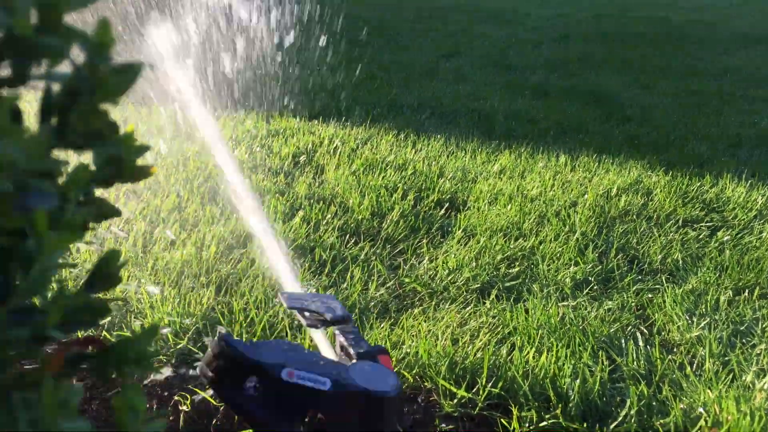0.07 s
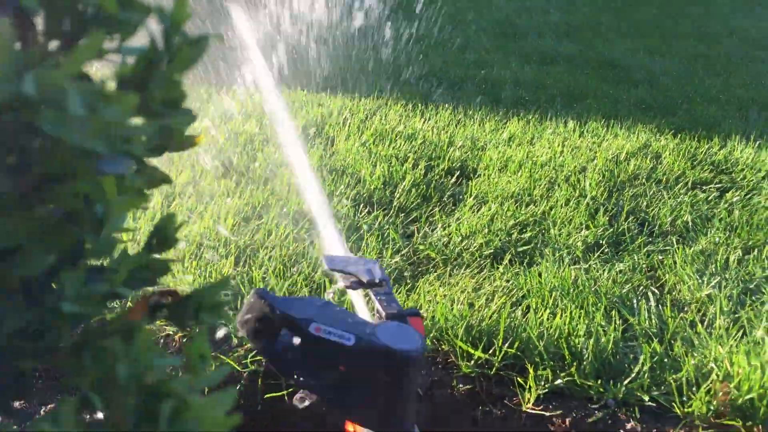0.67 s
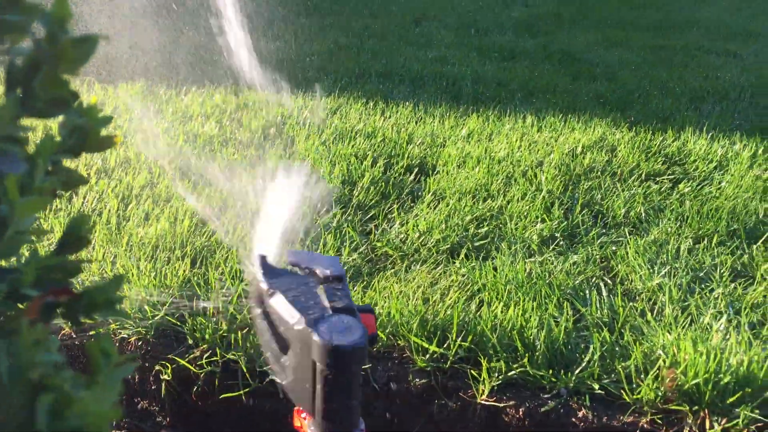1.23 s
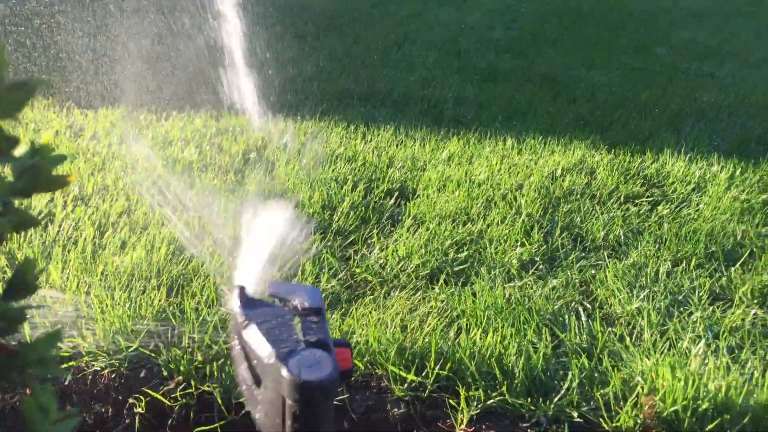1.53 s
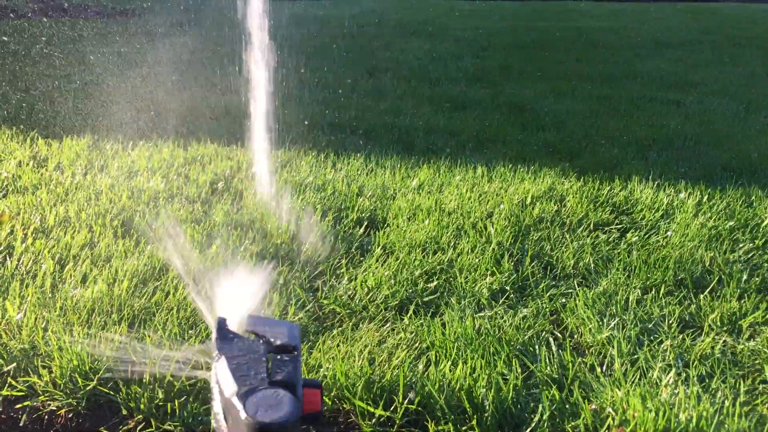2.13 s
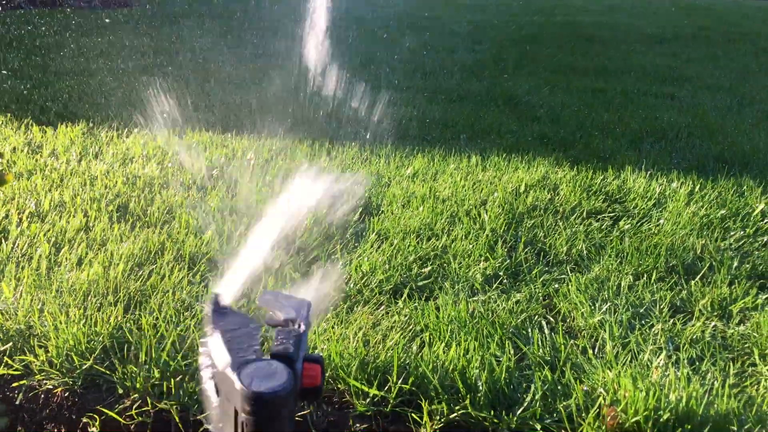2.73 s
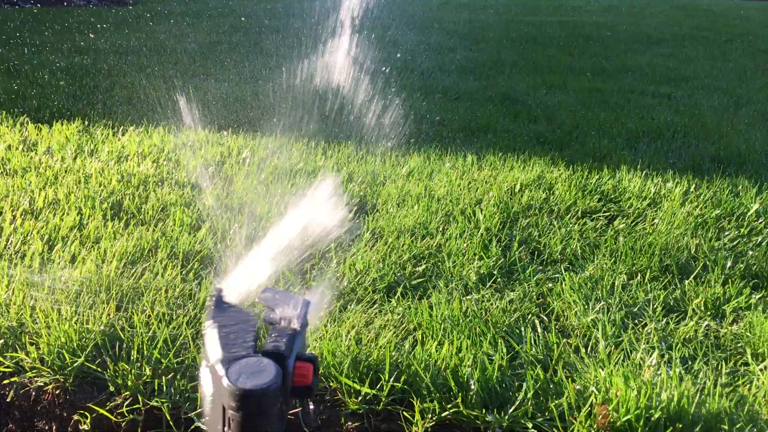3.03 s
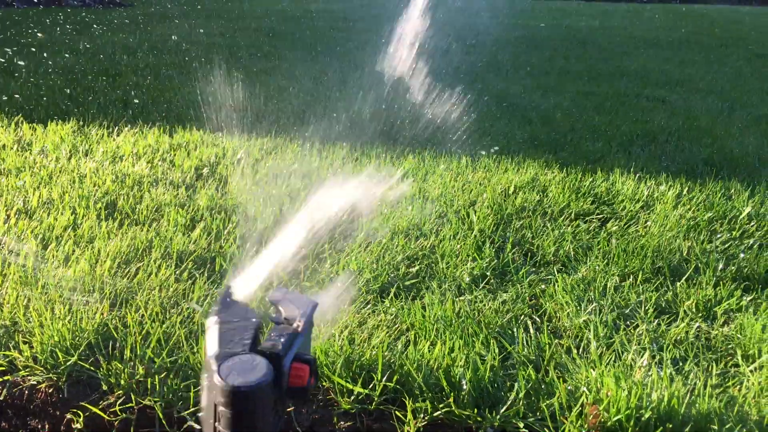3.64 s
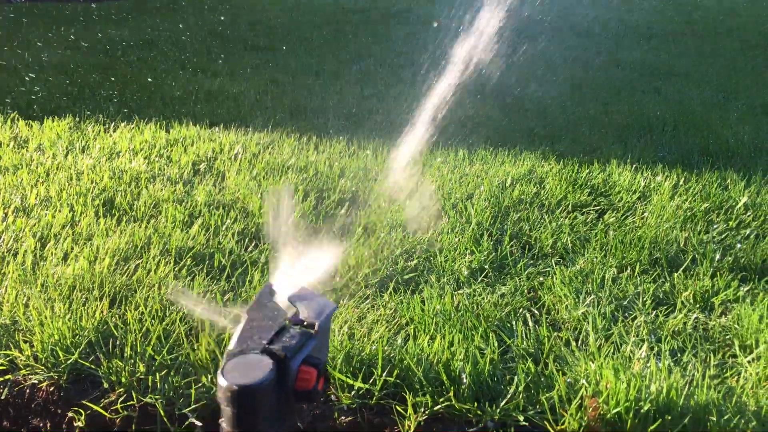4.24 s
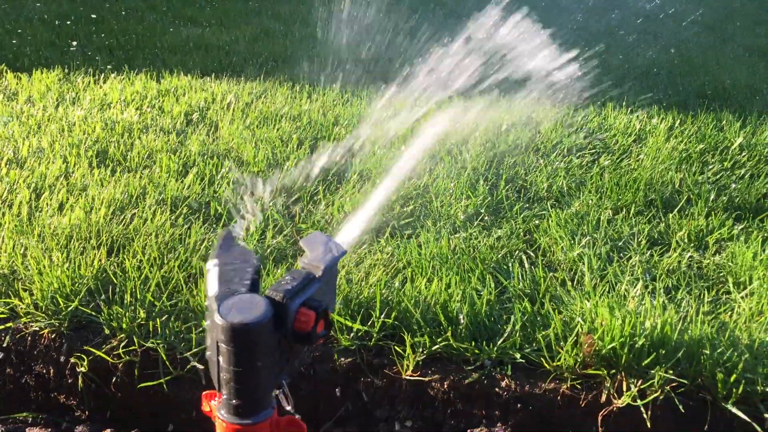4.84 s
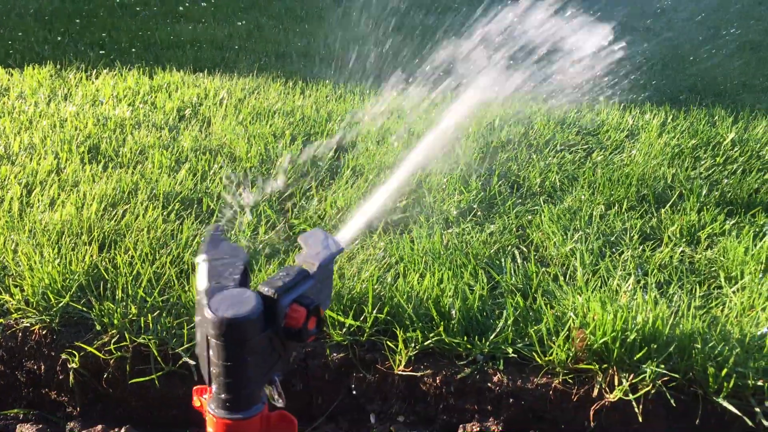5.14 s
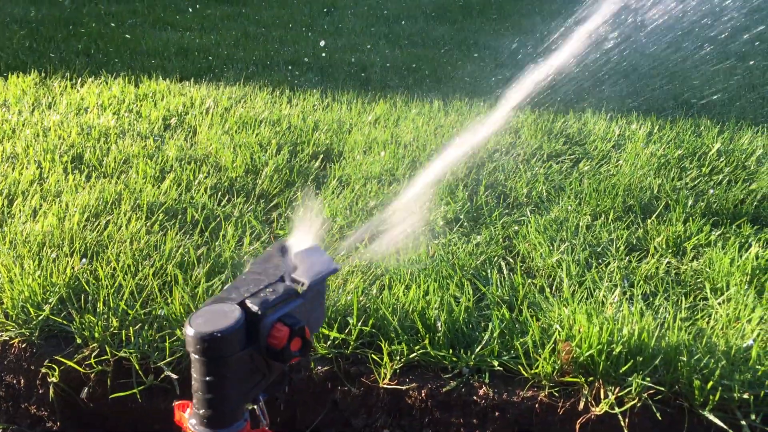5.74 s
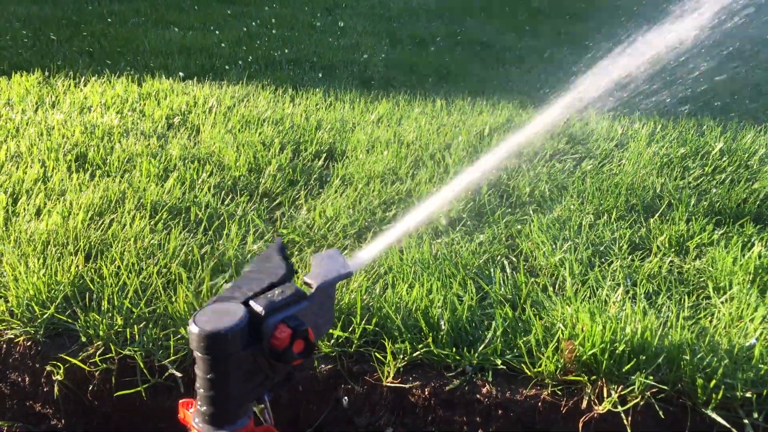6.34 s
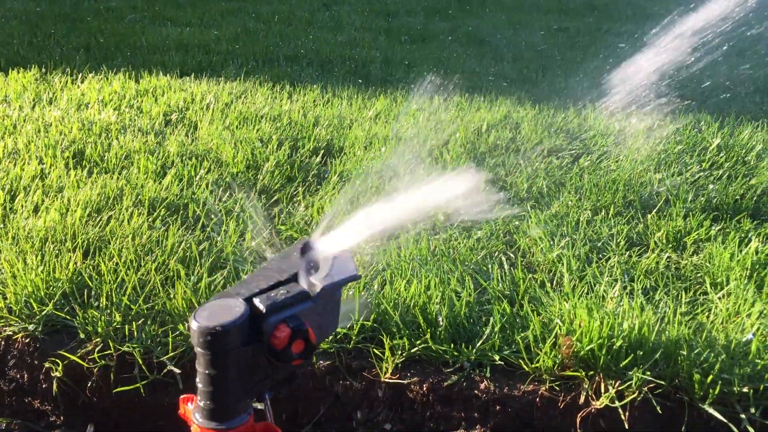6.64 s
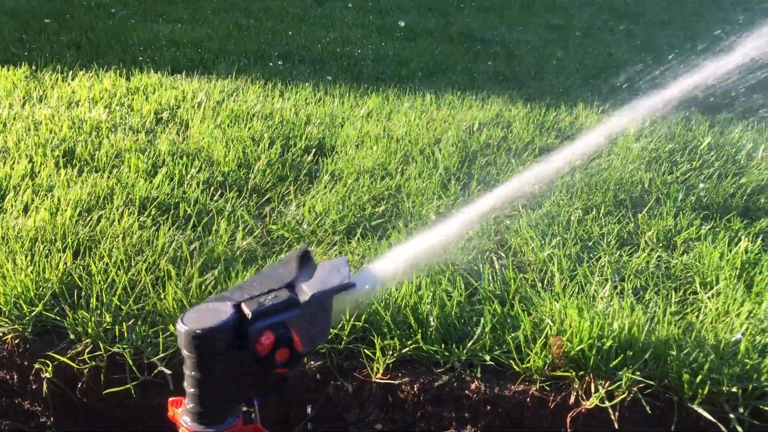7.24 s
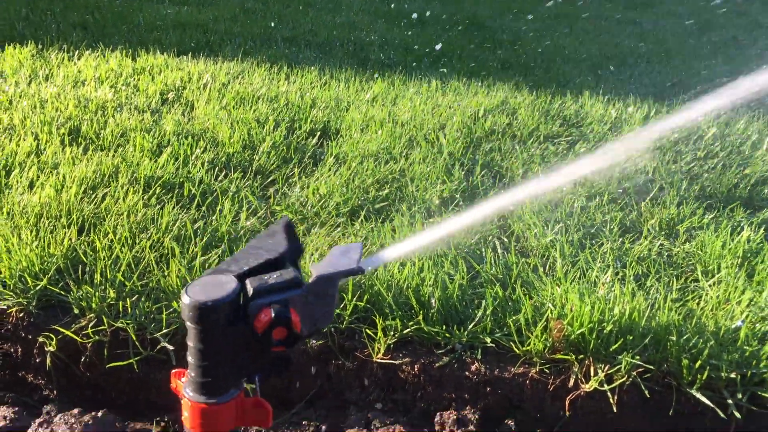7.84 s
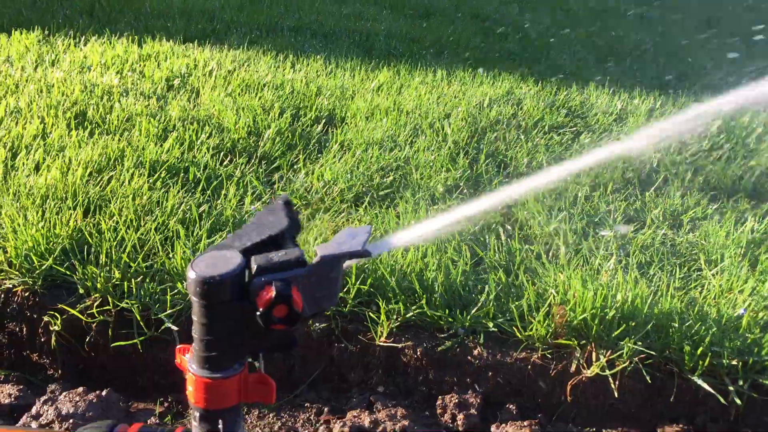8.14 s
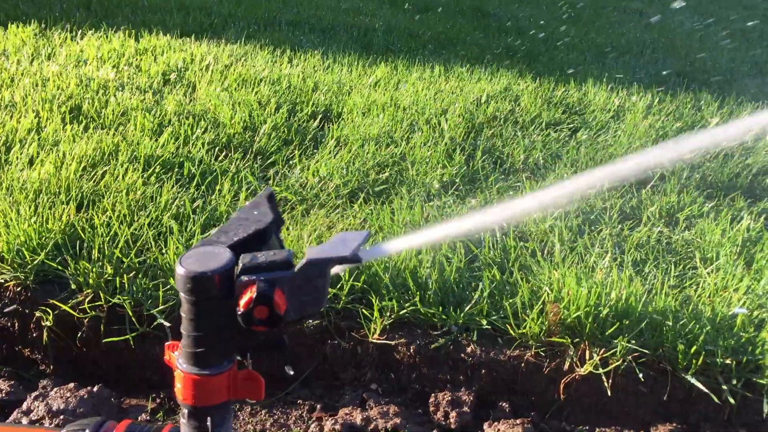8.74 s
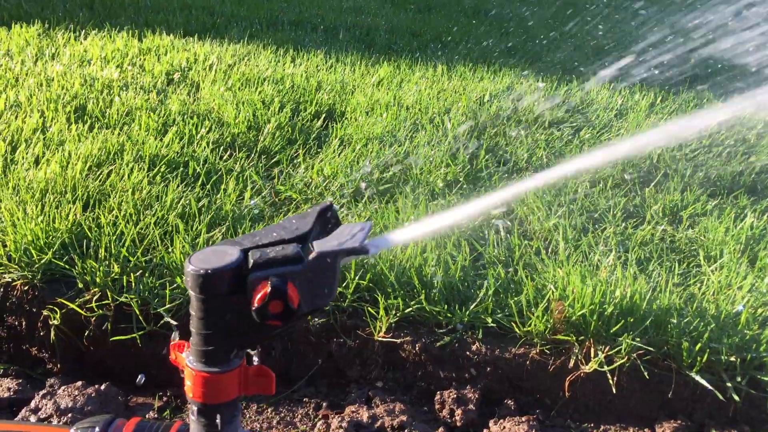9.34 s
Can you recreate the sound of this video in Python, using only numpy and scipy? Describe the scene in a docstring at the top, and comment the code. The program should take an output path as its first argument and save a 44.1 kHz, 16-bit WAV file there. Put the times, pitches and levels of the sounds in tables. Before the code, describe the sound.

A garden sprinkler ticks rapidly and regularly near the microphone, each stroke a hard plastic clack with a short wet slap. Underneath, the water jet hisses without a break and flung drops patter softly on the grass. A quiet neighbourhood rumble and a far-off engine hum, strongest at first, sit behind. At the very end the arm briefly flutters faster as it reverses.

```python
"""A steady hiss and sharp, even ticks: an impact sprinkler steps round on a lawn, close by.
Turbulence in the jet makes the hiss. Each swing of the sprung plastic arm slaps through the water,
knocks the frame into resonance and flings spray that patters on the grass. At the end the head trips
into reverse and the arm flutters fast. Distant engines hum over a low rumble, loudest at first."""
import sys
import numpy as np
from scipy import signal
from scipy.fft import rfft, irfft
from scipy.io import wavfile
from scipy.ndimage import uniform_filter1d

SR = 44100
rng = np.random.default_rng(int(sys.argv[2]) if len(sys.argv) > 2 else 0)


def dump(signal):
    """Clip the signal to [-1, 1] and save it as 16-bit WAV at the path in sys.argv[1]."""
    limited = np.clip(np.atleast_2d(signal).T, -1, 1)
    pcm = np.round(limited * 32767).astype(np.int16)
    wavfile.write(sys.argv[1], SR, pcm)


N = 418509
TIME = np.arange(N) / SR
TRIP_S = 9.264  # the reversing stop first catches the arm

# forward swings of the arm: (time [s], relative blow level [dB])
ARM_SWINGS = [(0.1386, -17.5), (0.29, -19.5), (0.4405, -18.5), (0.5902, -16.5), (0.7397, -17),
              (0.8882, -18), (1.0416, -16.5), (1.1891, -20.0), (1.339, -19.5), (1.4904, -20),
              (1.641, -18.5), (1.79, -18.5), (1.9447, -17), (2.0973, -18.5), (2.2475, -19.0),
              (2.398, -18.5), (2.5391, -18), (2.6842, -18.5), (2.8358, -19), (2.9864, -18.5),
              (3.137, -19.5), (3.2933, -16.5), (3.443, -18.5), (3.5933, -17), (3.7365, -19.0),
              (3.894, -16.5), (4.0452, -19), (4.202, -17), (4.3489, -19.5), (4.5046, -15.5), (4.651, -16),
              (4.8007, -16), (4.953, -15.5), (5.1039, -17.5), (5.251, -17.0), (5.406, -14.5), (5.5526, -19),
              (5.7101, -15.0), (5.854, -17.5), (6.0098, -16.5), (6.161, -18), (6.3139, -17.0),
              (6.4636, -20.5), (6.6193, -16.5), (6.774, -19), (6.931, -17.0), (7.0857, -18.0),
              (7.2437, -16.0), (7.3922, -19.5), (7.5476, -18.5), (7.6988, -18.5), (7.8566, -18),
              (8.0098, -18.5), (8.1657, -17.5), (8.3175, -18), (8.4689, -17.5), (8.625, -17),
              (8.781, -17.5), (8.9348, -16.5), (9.0861, -17), (9.2415, -15)]
# where the nozzle points: (time [s], heading right of straight ahead [deg])
NOZZLE_HEADING = [(0, -28.5), (9.25, 69), (9.49, 59.5)]
# modes of the plastic head: (frequency [Hz], width [Hz], level [dB], loudest heading [deg], beam [deg])
HEAD_MODES = [(313,96,-16.5,-27,19), (508,110,-13.5,67,36.6), (1133,110,-7,-30,130), (1574,82,-7.5,59,49),
              (1947,123,-1,29,44), (2200,216,1,26,81), (2460,330,-2,-25,110), (3170,220,-3,71,22),
              (3660,250,-4,12,47), (4130,200,-8.5,65,76), (4630,114,-4,13,55), (5467,260,0,31,36),
              (6170,84,1,14,20), (6530,240,-2.5,64,60), (7370,176,-3,28,26), (7980,280,-6.5,-28,47),
              (8350,780,-5.5,101,70), (9500,330,-2,91,24), (11420,530,-12,87,170), (13200,860,-11,85,89),
              (15200,570,-21,50,75)]


def arm(usual_blow_db=-17.6, stop_delay_s=0.0255):
    """A spring-driven oscillator: slow swings step the head on; quick ones, cut short, drive it back."""
    # swings in reverse: (time [s], relative slap level [dB], relative stop level [dB])
    flutter = [(9.312, -21, -29.5), (9.376, -21.5, -30), (9.438, -22, -26)]
    out = np.zeros(N)
    for s, blow_db in ARM_SWINGS:
        # harder blows are brighter, as is the frame when turned to the microphone
        tilt_db = 0.73 * (blow_db - usual_blow_db) + 0.6 * facing(s, aim_deg=24, beam_deg=25)
        water_db = -22.5 - 3 * facing(s, aim_deg=18, beam_deg=32.4)  # the head shades the slap
        add(out, *knock(s, blow_db - 4.5 - tilt_db / 2, blow_db - 1.53 + tilt_db / 2))
        add(out, *slap(s, water_db - 0.6, hold_s=0.015, roughness=0.8))
        add(out, *recoil(s, water_db - 24))
    for s, water_db, stop_db in flutter:
        add(out, *slap(s, water_db - 4, hold_s=0.019, roughness=1.5))
        add(out, *reversing_stop(s + stop_delay_s, stop_db))
    add(out, *reversing_stop(TRIP_S, -24))
    return out


def knock(s, hollow_db, rattle_db, lead_s=0.0016, contact_s=0.00079, split_hz=3200):
    """Impact excitation: the arm touches, seats and rebounds, ringing the modes of the head."""
    t = np.arange(512) / SR
    seat_s = 0.001221 * rng.uniform(0.7, 1.3)
    rebound_s = seat_s + 0.00221 * rng.uniform(0.63, 1.58)
    contacts = gain_of(1) * np.exp(-t / contact_s)
    pushes = np.zeros(len(t))
    for when, db in ((seat_s, 0), (rebound_s, -12)):
        contacts += gain_of(db) * (t >= when) * np.exp(-abs(t - when) / contact_s)
        add(pushes, when, gain_of([db]))
    rattle = filtered(contacts * rng.choice([-1, 1], len(t)), 4, split_hz, "high")
    head = impulse_response(HEAD_MODES, s)
    hollow = signal.fftconvolve(filtered(pushes, 4, split_hz, "low"), head)
    bright = signal.fftconvolve(rattle, head)
    blow = gain_of(hollow_db) * unit_rms(hollow) + gain_of(rattle_db) * unit_rms(bright)
    return s - lead_s, blow * np.sqrt(0.0046 * SR / len(blow))  # the energy of 4.6 ms at these levels


def slap(s, db, hold_s, roughness, rise_s=0.0048, release_s=0.0029, sag_db_per_s=208, lead_s=0.0005):
    """Jet break-up: water bursts on the arm in lumpy noise, sagging for the hold_s it stays in the jet."""
    # slap resonances: (frequency [Hz], width [Hz], level [dB], loudest heading [deg], beam [deg])
    slap_modes = [(1290, 92, -15, -16, 120), (2200, 515, -6, 89, 320), (3645, 650, -1.5, -38, 150),
                  (4120, 680, -1, 81, 94), (5490, 420, -1.9, 80, 680), (6550, 1030, -3.5, 85, 140),
                  (7600, 170, -10, -40, 250), (8670, 710, -3, 88, 200), (9870, 290, -7, 85, 179),
                  (11400, 1050, -9, -40, 250), (13242, 1200, -11, 85, 88), (16500, 3600, -11.5, 85, 250)]
    t = np.arange(-512, 1536) / SR
    envelope = bell(np.minimum(t, 0), 0, rise_s) * np.exp(-np.maximum(t - hold_s, 0) / release_s)
    splatter = unit_rms(rng.standard_normal(len(t)) * gain_of(roughness * drift(len(t), per_s=1519)))
    burst = splatter * envelope * gain_of(db - sag_db_per_s * (t - hold_s))
    return s + t[0] - lead_s, signal.fftconvolve(burst, impulse_response(slap_modes, s))


def recoil(s, db, release_s=0.0158, push_s=0.0019):
    """Reaction force: the stem thuds softly as the arm loads the jet and again as it lets go."""
    t = np.arange(-512, 2048) / SR
    load = bell(t, 0, push_s) + gain_of(-6) * bell(t, release_s, push_s)
    return s + t[0], gain_of(db) * load * noise_band(len(t), hz=[130, 380])


def reversing_stop(s, db, ring_hz=4200, width_s=0.0028):
    """Contact chatter: the wet arm rattles on the stop, exciting the head's modes and a brief tone."""
    t = np.arange(-256, 256) / SR
    chatter = signal.fftconvolve(rng.standard_normal(len(t)), impulse_response(HEAD_MODES, s))[:len(t)]
    tone = gain_of(-3) * np.sin(2 * np.pi * ring_hz * t)
    envelope = gain_of(db + 1.5) * np.exp(-(t / width_s) ** 2 / 2)
    return s + t[0], envelope * (unit_rms(chatter) + tone)


def jet(patchy_db=1.17, flicker_db=1.57, waver_db=1.46, mist_db=-5, split_hz=7400):
    """Turbulence drives the nozzle's resonances: rush below, fizz above, coloured by the heading."""
    # nozzle resonances: (frequency [Hz], width [Hz], level [dB], loudest heading [deg], beam [deg])
    nozzle_modes = [(640,49,-7.5,-5,56), (1720,360,-2.5,30,69), (2230,740,-4,34,120), (3300,540,0,-48,58),
                    (4010,390,-0.5,16,220), (5460,980,-5.5,68,240), (6550,740,-6,92,83),
                    (8360,510,-1.5,68,410), (9780,240,2,75,140), (11300,220,8,-40,52), (11450,580,2,55,200),
                    (12800,370,1,5,90), (13600,1200,-2,65,160), (15500,1400,-2,87,160)]
    hz, t, spectrum = signal.stft(rng.standard_normal(N), SR, nperseg=512, noverlap=384)
    patches = smoothed(uniform_filter1d(rng.standard_normal(spectrum.shape), size=6, axis=0), frames=10)
    flicker = smoothed(rng.standard_normal(len(t)), frames=3)
    spectrum *= gain_of(patchy_db * patches + flicker_db * flicker)
    # as the flow shifts, each resonance swells on its own and all drift a little in pitch
    wavers = smoothed(rng.standard_normal((len(nozzle_modes), len(t))), frames=16)
    detune = 1 + 0.0073 * smoothed(rng.standard_normal(len(t)), frames=50)
    colour = sum((radiated([mode], hz[:, None] * detune, t) * gain_of(waver_db * waver)) ** 2
                 for mode, waver in zip(nozzle_modes, wavers))
    treble = 1 / (1 + (split_hz / (hz[:, None] + 1)) ** 10)
    colour += gain_of(mist_db) ** 2 * treble  # mist torn off the jet hisses without a pitch
    rush_db, fizz_db = jet_levels(t)
    power = 0
    for share, db in ((1 - treble, rush_db), (treble, fizz_db)):
        running_mean = uniform_filter1d(np.mean(colour * share, axis=0), size=60)
        power += colour * share / running_mean * gain_of(db) ** 2
    return signal.istft(spectrum * np.sqrt(power), nperseg=512, noverlap=384)[1][:N]


def jet_levels(t, rush_db=-41.5, fizz_db=-39, step_db=0.56):
    """Directivity: the jet is louder side-on; its rush also grows on grazing a shrub and in reverse."""
    steps = np.searchsorted([s for s, _ in ARM_SWINGS], t)
    shift_db = step_db * rng.standard_normal(len(ARM_SWINGS) + 1)[steps]
    side_on_db = 1.5 * facing(t, aim_deg=59, beam_deg=15)
    shrub_db = 2.5 * facing(t, aim_deg=-30, beam_deg=6.1)
    reverse_db = 3.5 * np.clip((t - TRIP_S) / 0.23, 0, 1)
    return rush_db + side_on_db + shrub_db + reverse_db + shift_db, fizz_db + side_on_db + shift_db


def whistle(start_s=8.186, length_s=0.05, hz=8300, db=-37, wobble=300):
    """The water sings once: random modulation of pitch and level spreads a tone into a narrow band."""
    out, size = np.zeros(N), int(length_s * SR)
    cycles = np.cumsum(hz + wobble / 2 * drift(size, per_s=600)) / SR
    tone = unit_rms(np.sin(2 * np.pi * cycles) * gain_of(3.3 * drift(size, per_s=210)))
    add(out, start_s, gain_of(db) * tone * signal.windows.tukey(size, 0.5))
    return out


def spray(db=-44, drops_per_s=2500, spread_db=20, rise_s=0.0067, fade_s=0.065):
    """Shot noise: after each forward swing, drops of flung water strike the grass at random."""
    t = np.arange(SR // 3) / SR
    showers = np.zeros(N)
    for s, _ in ARM_SWINGS:
        add(showers, s, (1 - bell(t, 0, rise_s)) * np.exp(-t / fade_s))
    drops = (rng.random(N) < drops_per_s / SR) * rng.choice([-1, 1], N)
    strengths = gain_of(spread_db * np.minimum(rng.exponential(1, N), 2))
    patter = filtered(drops * strengths, 2, [4300, 10000], "band")
    return gain_of(db) * showers * unit_rms(patter)


def garden_echo(ticks, tail_db=-17, ground_db=-12, ground_s=0.0021, ground_hz=2800):
    """Scattering: nearby soil returns the mid range at once, shrubs a faint, short reverberant tail."""
    # decay among the shrubs: (frequency [Hz], time to fall 60 dB [s])
    decay_times = [(300, 0.28), (2000, 0.18), (6000, 0.084), (15000, 0.058)]
    hz, t, spectrum = signal.stft(rng.standard_normal(SR // 4), SR, nperseg=128)
    decay = gain_of(-60 * t / log_interp(decay_times, hz)[:, None])
    tail = signal.istft(spectrum * decay, SR, nperseg=128)[1]
    out = gain_of(tail_db) * signal.fftconvolve(ticks, tail / np.linalg.norm(tail))[:N]
    t = np.arange(2048) / SR
    for s, _ in ARM_SWINGS:  # the paths change with every step of the head
        paths = rng.standard_normal(len(t)) * np.exp(-t / ground_s) * (t > 0.002)
        scatter = filtered(paths / np.linalg.norm(paths), 3, ground_hz, "low")
        start_s = s - 0.01
        tick = ticks[round(start_s * SR):][:len(t)]
        add(out, start_s, gain_of(ground_db) * signal.fftconvolve(tick, scatter))
    return out


def engines(rise_s=0.26):
    """Distant engines pull: each is a low periodic source whose hum swells, climbs in pitch and fades."""
    # hums: (start [s], fade begins after [s], fade [dB/s], frequency [Hz], climb [Hz/s], level [dB])
    pulls = [(-.25, 2.2, 110, 54, 5.2, -49.5), (3.1, 4.1, 25, 68, .3, -64), (3.65, .45, 26, 47.5, 1.8, -55),
             (4.8, 1.1, 13, 50.7, .6, -65)]
    out = np.zeros(N)
    for start_s, held_s, fade_db_per_s, hz, climb_hz_per_s, db in pulls:
        t = np.maximum(TIME - start_s, 0)
        hum = unit_rms(np.sin(2 * np.pi * np.cumsum(hz + climb_hz_per_s * t) / SR))
        out += hum * np.minimum(t / rise_s, 1) * gain_of(db - fade_db_per_s * np.maximum(t - held_s, 0))
    dip_db = -15 * bell(TIME, centre=0.91, width=0.21)  # the first hum sinks briefly
    return out * gain_of(dip_db + drift(N, per_s=7.8))


def rumble(db=-53.2, ease_db_per_s=0.25):
    """Ambient noise of the neighbourhood, weighted to the bass, swelling at random and slowly easing."""
    # ambient spectrum: (frequency [Hz], relative spectral density [dB])
    density = [(20, -44), (35, -11), (50, -6), (72, 3.5), (100, -7), (160, -2.5), (250, -11.5),
               (450, -12.5), (660, -19), (800, -18.5), (1200, -9.5), (3000, -30.5)]
    colour = gain_of(log_interp(density, np.fft.rfftfreq(N, 1 / SR)))
    noise = unit_rms(irfft(rfft(rng.standard_normal(N)) * colour, N))
    return noise * gain_of(db - ease_db_per_s * TIME + drift(N, per_s=9))


def bump(time_s=5.7, width_s=0.047, db=-51):
    """A low-frequency transient: one dull bump nearby, barely above the rumble."""
    return gain_of(db) * bell(TIME, time_s, width_s) * noise_band(N, hz=[90, 180])


def facing(s, aim_deg, beam_deg):
    """A Gaussian directivity lobe: how nearly the nozzle points at aim_deg at time s, from 0 to 1."""
    return bell(np.interp(s, *np.transpose(NOZZLE_HEADING)), aim_deg, beam_deg)


def radiated(modes, hz, s):
    """Gain at hz and time s of resonances that add in power, each radiating in its own direction."""
    power = sum(gain_of(db) ** 2 * facing(s, aim_deg, beam_deg) / (1 + ((hz - centre) / width) ** 2) ** 2
                for centre, width, db, aim_deg, beam_deg in modes)
    return np.sqrt(power + 1e-9)


def impulse_response(modes, s, size=2048):
    """Minimum-phase ringing of the resonances at time s, with unit energy."""
    log_gain = np.log(radiated(modes, abs(np.fft.fftfreq(size, 1 / SR)), s))
    response = np.fft.ifft(np.exp(np.conj(signal.hilbert(log_gain)))).real[:size // 2]
    return response / np.linalg.norm(response)


def drift(size, per_s):
    """Random modulation: straight lines join per_s Gaussian values a second."""
    knots = 2.26 * rng.standard_normal(size // 8 + 2)
    return np.interp(np.arange(size) * per_s / SR, np.arange(len(knots)), knots)


def noise_band(size, hz):
    """Band-limited noise of unit rms."""
    return unit_rms(filtered(rng.standard_normal(size), 2, hz, "band"))


def filtered(x, order, hz, kind):
    """A causal filter with a maximally flat passband."""
    return signal.sosfilt(signal.butter(order, hz, kind, fs=SR, output="sos"), x)


def smoothed(x, frames):
    """A moving average over time, scaled to unit rms."""
    return unit_rms(uniform_filter1d(x, frames))


def log_interp(points, hz):
    """Linear interpolation over log frequency."""
    point_hz, values = np.transpose(points)
    return np.interp(np.log(hz + 1), np.log(point_hz + 1), values)


def bell(x, centre, width):
    """A Gaussian hump of height 1."""
    return np.exp(-((x - centre) / width) ** 2)


def gain_of(db):
    """Decibels to an amplitude ratio."""
    return 10 ** (np.asarray(db) / 20)


def unit_rms(x):
    """Normalisation to unit mean power."""
    return x / np.sqrt(np.mean(x ** 2) + 1e-20)


def add(mix, s, sound):
    """Superposes a sound on the mix at time s."""
    part = mix[round(s * SR):][:len(sound)]
    part += sound[:len(part)]


def scene():
    """Superposition of sprinkler, falling spray and neighbourhood at one microphone."""
    ticks = arm()
    return (ticks + garden_echo(ticks) + jet() + whistle() + spray() + rumble() + engines() + bump())[None]


def record(dry, ceiling=0.6, edge_hz=15850):
    """The microphone sheds the deepest bass, saturation rounds the peaks and a low-pass limits the band."""
    x = filtered(dry, 4, 40, "high")
    rounded = x / (1 + (x / ceiling) ** 4) ** (1 / 4)
    low_pass = signal.firwin(511, edge_hz, window=("kaiser", 9), fs=SR)
    return signal.oaconvolve(rounded, low_pass[None], "same")


dry = scene()
out = record(dry)
dump(out)
```